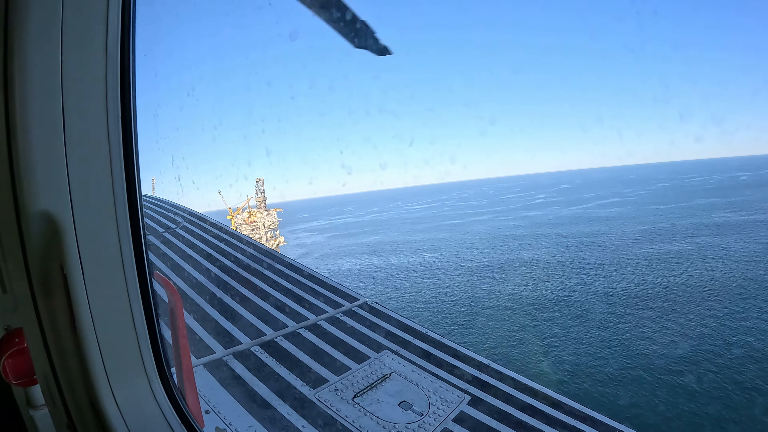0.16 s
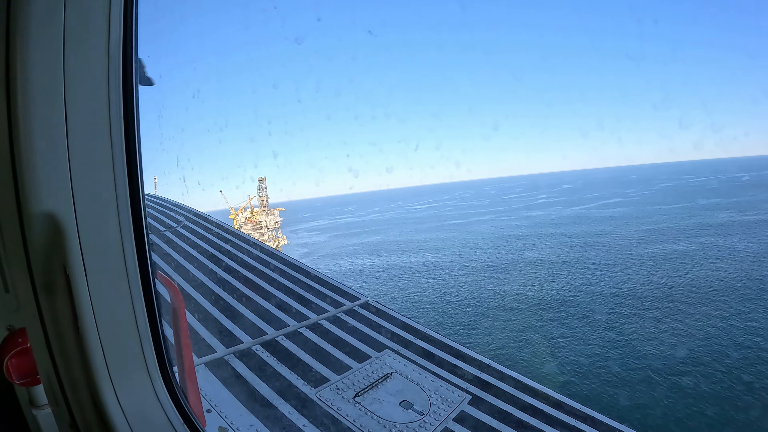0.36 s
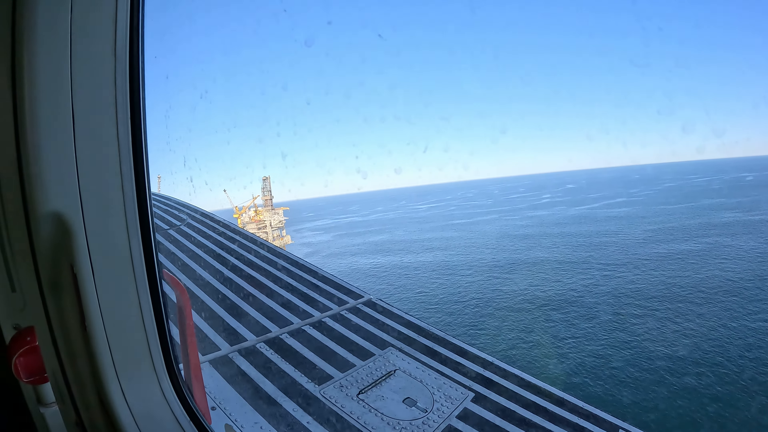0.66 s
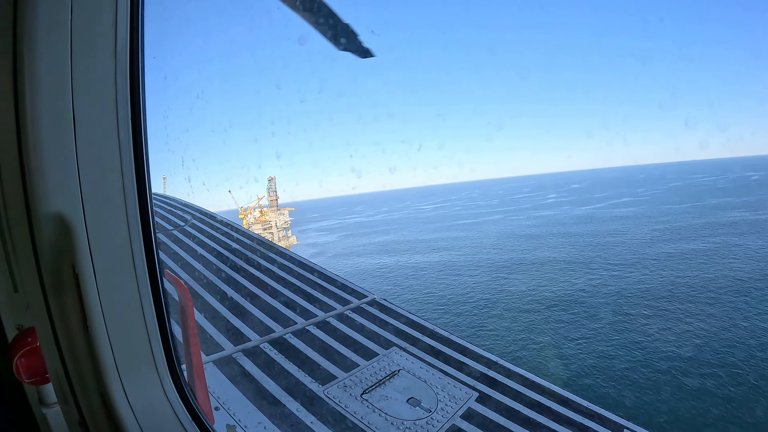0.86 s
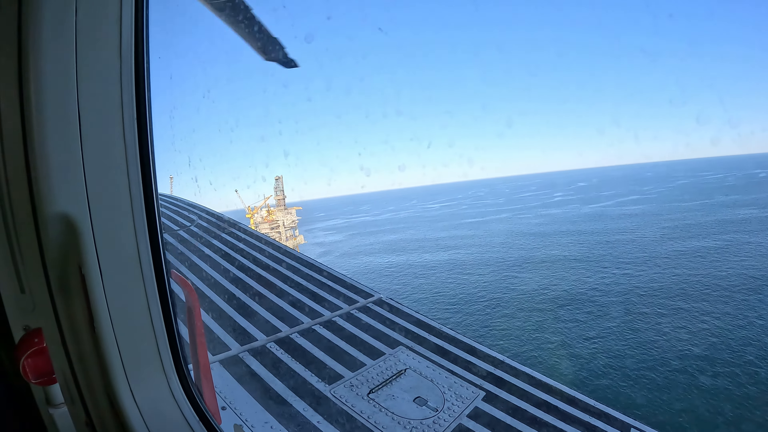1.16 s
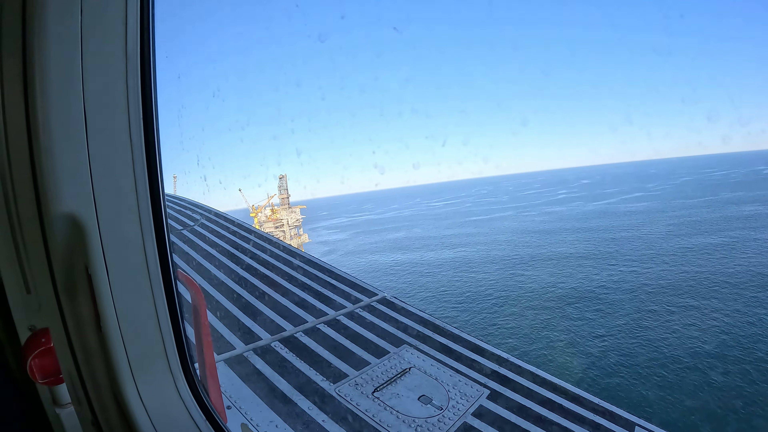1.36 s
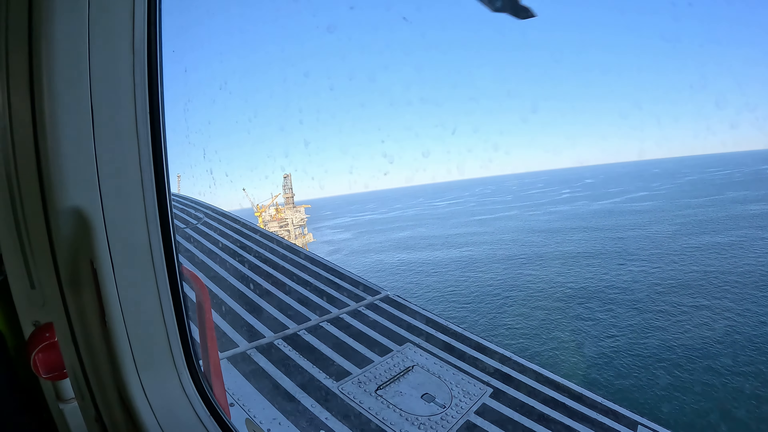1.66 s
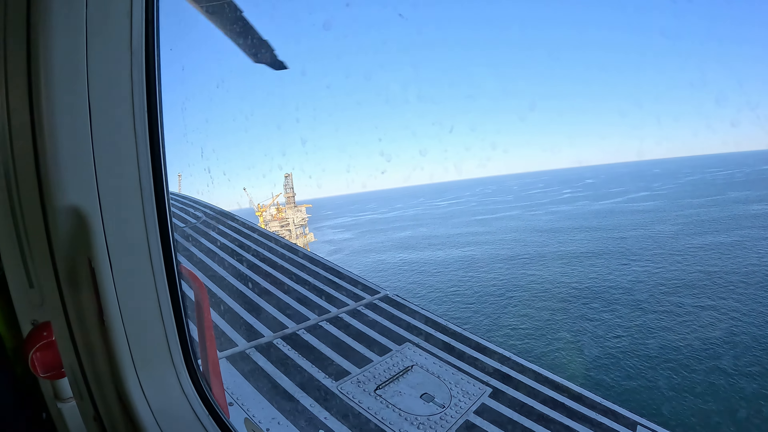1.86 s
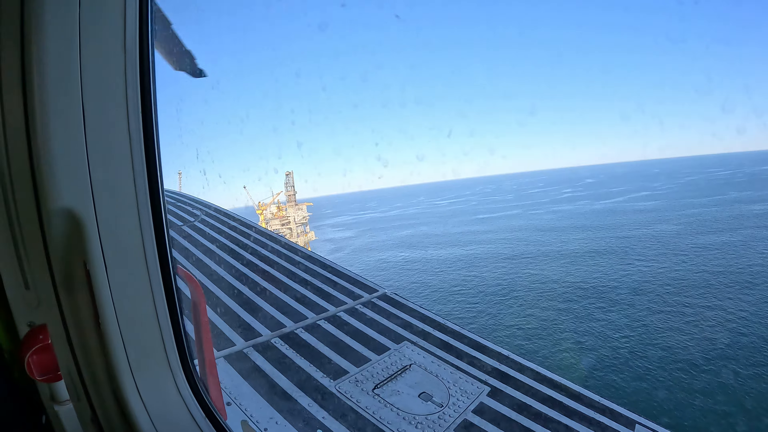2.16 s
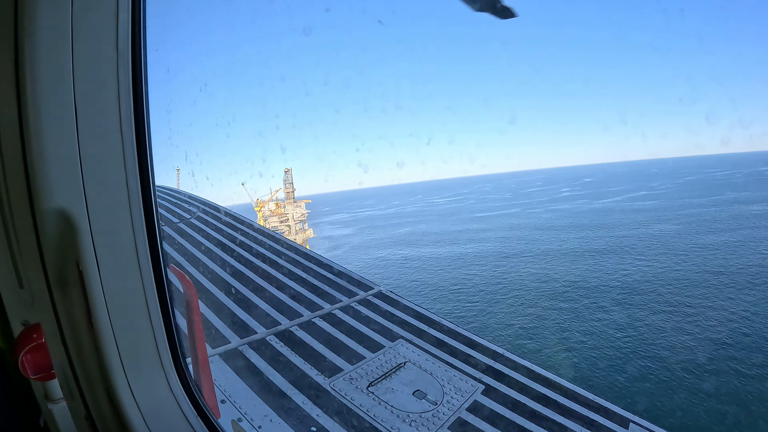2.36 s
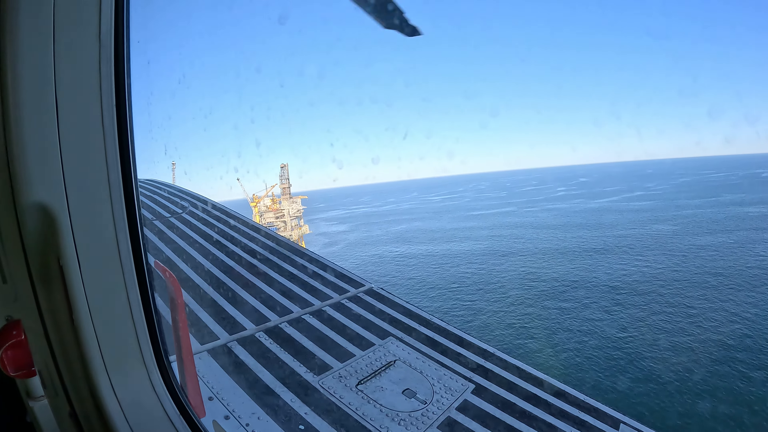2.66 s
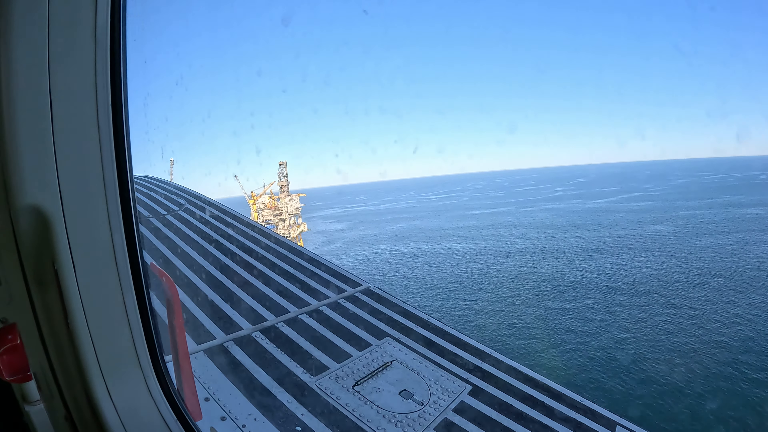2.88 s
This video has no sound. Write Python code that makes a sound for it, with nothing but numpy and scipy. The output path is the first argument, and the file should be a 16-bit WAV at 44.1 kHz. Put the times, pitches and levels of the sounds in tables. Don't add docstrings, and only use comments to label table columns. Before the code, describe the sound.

Helicopter heard from inside its cabin over open sea: a loud, constant low roar with rapid rotor thumping, a tail rotor hum and muffled wind, captured close by a microphone that levels the peaks.

```python
import sys
import numpy as np
from scipy import signal
from scipy.fft import rfft, irfft, next_fast_len
from scipy.io import wavfile

SR = 44100
rng = np.random.default_rng(int(sys.argv[2]) if len(sys.argv) > 2 else 0)


def elevation(decibels):
    levels = np.asarray(decibels, float)
    return 10 ** (levels / 20)


def output_pcm(signal):
    pcm = np.clip(np.atleast_2d(signal).T, -1, 1) * 32767
    wavfile.write(sys.argv[1], SR, np.round(pcm).astype(np.int16))


N = 133182

# (multiple of the blade-pass rate, level [dB rms])
BLADE_TONES = [(1, -22.5), (2, -29.0), (3, -24.7), (4, -30.1), (5, -27.8), (6, -31.5), (7, -37.8),
               (8, -26.5), (9, -46.5), (11, -40.3), (12, -39.4), (14, -41.8), (16, -39.6), (17, -41.0),
               (19, -41.5)]
# (multiple of the shaft rate, level [dB rms])
UNEVEN_BLADE_TONES = [(3, -40.7), (5, -42.9), (6, -34.9), (7, -36.5), (9, -40.7), (10, -40.2), (11, -40.9),
                      (13, -35.2), (14, -35.5), (17, -32.3), (18, -38.1), (19, -42.0), (21, -40.6),
                      (22, -38.3), (23, -38.9), (25, -39.5), (26, -42.7), (27, -36.6), (29, -38.5),
                      (30, -36.1), (33, -39.2), (35, -41.2), (38, -35.1), (41, -42.7), (43, -41.3),
                      (45, -42.5), (49, -40.0), (57, -42.8)]
# (multiple of its blade-pass rate, level [dB rms])
TAIL_TONES = [(1, -21.1), (2, -24.3), (3, -34.1), (4, -46.1), (8, -44.2)]
# (frequency [Hz], level [dB rms])
GEAR_TONES = [(365.3, -31.0), (721.1, -36.3), (755.2, -41.9), (666.2, -42.8), (668.1, -40.7),
              (1331.5, -56.8), (1416.3, -50.6), (1515.1, -58.9), (1954.3, -59.0), (1980.3, -59.4),
              (1991.0, -58.4), (2110.9, -55.4), (2191.5, -59.4), (2849.9, -73.1), (3121.8, -57.3),
              (3464.8, -59.1), (3933.3, -68.1), (3960.9, -69.4), (4233.7, -75.2), (5215.0, -78.9)]
# (frequency [Hz], level [dB per Hz])
BUFFETING = [(12, -33), (24, -38), (72, -45), (125, -41.5), (210, -50.5), (330, -44), (410, -49),
             (460, -55.5)]
# (frequency [Hz], level [dB per Hz])
PANEL_ROAR = [(460, -53.5), (570, -50), (745, -54), (775, -56.5), (1050, -58), (1110, -66.5), (1450, -67.5),
              (1800, -73)]
# (frequency [Hz], level [dB per Hz])
TURBINE_NOISE = [(1800, -75.5), (2130, -70), (2480, -74.5), (3210, -71.5), (3480, -74), (3670, -79.5),
                 (4900, -81.5), (5590, -86)]
# (frequency [Hz], level [dB per Hz])
SEAL_HISS = [(5590, -86), (6840, -83.5), (8500, -87), (9200, -95), (10300, -94.5), (12700, -103),
             (14000, -109), (16000, -118)]
# (frequency [Hz], width [Hz], level [dB rms])
RINGING_CAVITIES = [(970.5, 64, -33), (679, 13, -43), (404, 27, -35.5), (1340, 11, -50.5), (1950, 80, -56),
                    (2900, 41, -71), (3148, 38, -51), (3433, 10, -57), (4140, 50, -79), (4874, 40, -59.5),
                    (5200, 23, -63), (6800, 210, -59)]
# (time [s], peak level [dB])
TRIM_KNOCKS = [(0.1456, -40), (1.0061, -37), (1.1318, -43), (1.4721, -42), (1.6472, -40), (1.7644, -36),
               (1.8188, -38), (1.9964, -43), (2.2238, -40), (2.2857, -41), (2.7407, -44), (2.9282, -39)]

SHAFT_HZ, BLADES = 4.2925, 4
TAIL_PASS_HZ = 83.44
ROTOR_WANDER_DB = -0.5
HISS_RISE_DB_PER_S = 1


def clock():
    return np.arange(N) / SR


def rms_one(x):
    return x / np.sqrt(np.mean(x ** 2) + 1e-20)


def drift(rate_hz):
    r = np.exp(-2 * np.pi * rate_hz * 40 / SR)
    noise = rng.standard_normal(N // 40 + 2002)
    slow = signal.lfilter([1], [1, -2 * r, r * r], noise)[2000:]
    slow = rms_one(slow - slow.mean())
    return np.interp(np.arange(N) / 40, np.arange(len(slow)), slow)


def coloured(points):
    size = next_fast_len(N)
    hz = np.arange(1, size // 2 + 2) * SR / size
    at_hz, db = np.transpose(points)
    gain = elevation(np.interp(np.log(hz), np.log(at_hz), db, left=-200, right=-200))
    spectrum = rfft(rng.standard_normal(size)) * gain
    return irfft(spectrum, size)[:N] * np.sqrt(SR / 2)


def resonance(x, hz, width_hz):
    r = np.exp(-np.pi * width_hz / SR)
    top = np.array([1, 0, -1]) * (1 - r * r) / 2
    return signal.lfilter(top, [1, -2 * r * np.cos(2 * np.pi * hz / SR), r * r], x)


def blade_swell(sharpness):
    first_pass_s = 0.019
    turn = 2 * np.pi * BLADES * SHAFT_HZ * (clock() - first_pass_s)
    return np.exp(sharpness * (np.cos(turn) - 1))


def rotation_tones(table, base_hz, lag_s=0):
    total = np.zeros(N)
    for multiple, db in table:
        level = np.sqrt(2) * elevation(db + ROTOR_WANDER_DB * drift(0.51))
        cycles = multiple * base_hz * (clock() - lag_s) + rng.random()
        total += level * np.sin(2 * np.pi * cycles)
    return total


def main_rotor():
    even_tones = rotation_tones(BLADE_TONES, BLADES * SHAFT_HZ)
    return even_tones + rotation_tones(UNEVEN_BLADE_TONES, SHAFT_HZ)


def high_rotor_tones():
    table = [(39, -35)]
    for multiple in range(46, 112):
        if multiple % BLADES:
            db = -43.5 - 0.32 * (multiple - 60) + 4 * rng.standard_normal()
            table.append((multiple, db))
    return rotation_tones(table, SHAFT_HZ)


def tail_rotor():
    return elevation(0.3) * rotation_tones(TAIL_TONES, TAIL_PASS_HZ, lag_s=0.0118)


def gearbox():
    turned_s = np.cumsum(1 + 0.00022 * drift(1.9)) / SR
    total = np.zeros(N)
    for hz, db in GEAR_TONES:
        level = np.sqrt(2) * elevation(db + 2.0 * drift(5.2))
        total += level * np.sin(2 * np.pi * (hz * turned_s + rng.random()))
    return total


def cavity_ringing():
    total = np.zeros(N)
    for hz, width_hz, db in RINGING_CAVITIES:
        ring = resonance(rng.standard_normal(N), hz, width_hz)
        ring = resonance(ring, hz, width_hz)
        total += elevation(db) * rms_one(ring)
    return total


def airflow():
    throb = blade_swell(sharpness=3.4)
    tail_throb = np.cos(2 * np.pi * TAIL_PASS_HZ * clock())
    rise_db = HISS_RISE_DB_PER_S * (clock() - 1.5)
    roar = elevation(-0.1 * throb) * (coloured(PANEL_ROAR) + cavity_ringing())
    turbine = elevation(0.59 * rise_db + 0.2 * drift(7)) * coloured(TURBINE_NOISE)
    hiss_db = rise_db + 2 * throb + 0.7 * tail_throb + 0.48 * drift(8.7)
    return coloured(BUFFETING) + roar + turbine + elevation(hiss_db) * coloured(SEAL_HISS)


def trim_ticks():
    ticks_per_s, ring_s = 1100, 0.004
    sizes = elevation(2.0 * np.minimum(rng.exponential(1, N), 3) + 2.5 * drift(7.1))
    born = rng.random(N) < ticks_per_s * blade_swell(sharpness=8.0) / SR
    time_s, peak_db = np.transpose(TRIM_KNOCKS)
    knocks = np.zeros(N)
    knocks[(time_s * SR).astype(int)] = elevation(peak_db - 6)
    width_hz = 2.2 / ring_s
    ticks, hard = np.zeros(N), np.zeros(N)
    for hz in np.geomspace(7500, 12700, 8):
        tick_hits = sizes * born * rng.standard_normal(N) + 1e-18
        ticks += resonance(tick_hits, hz, width_hz)
        knock_hits = knocks * rng.uniform(-0.68, 1, N) + 1e-18
        hard += resonance(knock_hits, hz, width_hz / 2) * SR / (np.pi * width_hz)
    tick_db = -67.5 + HISS_RISE_DB_PER_S * 2 * (clock() - 2.5)
    both = elevation(tick_db) * rms_one(ticks) + hard
    soften = signal.butter(4, 14000, fs=SR, output="sos")
    return signal.sosfilt(soften, both)


def scene():
    machine = elevation(0.6) * (main_rotor() + tail_rotor() + gearbox())
    cabin = machine + high_rotor_tones() + airflow() + trim_ticks()
    return cabin[None, :]


def top_cut(x):
    return signal.sosfilt(signal.butter(12, 15700, fs=SR, output="sos"), x)


def record(dry):
    averaging_s, share_removed, ceiling = 0.014, 0.15, 0.99
    r = np.exp(-1 / (averaging_s * SR))
    mean_power = np.mean(dry ** 2)
    power = mean_power + signal.lfilter([1 - r], [1, -r], dry ** 2 - mean_power)
    even = dry * (power / mean_power) ** (-share_removed / 2)
    mix = ceiling * np.tanh(even / ceiling)
    return top_cut(mix)


dry = scene()
out = record(dry)
output_pcm(out)
```